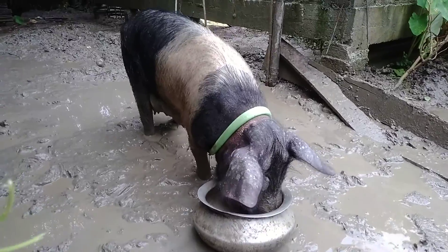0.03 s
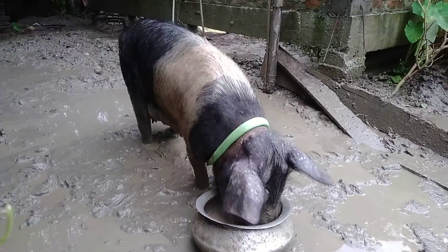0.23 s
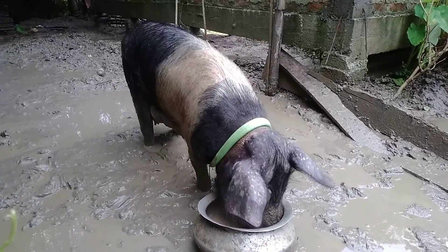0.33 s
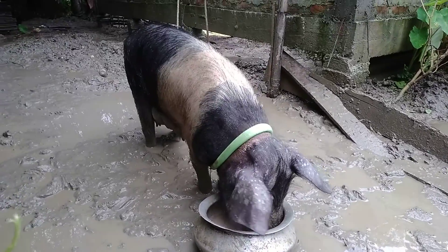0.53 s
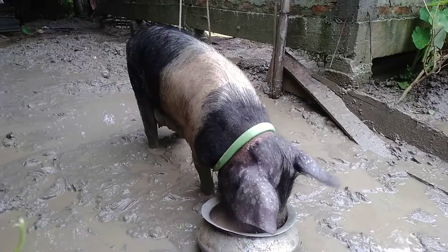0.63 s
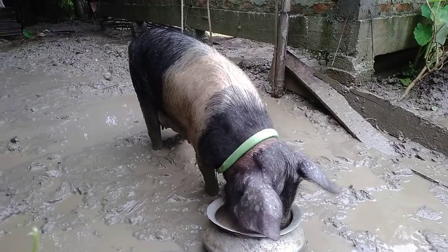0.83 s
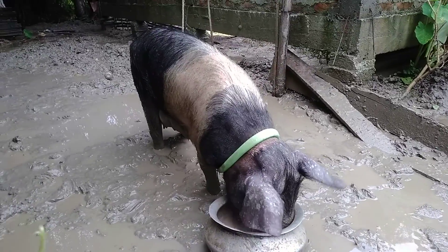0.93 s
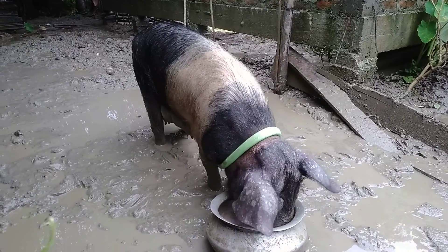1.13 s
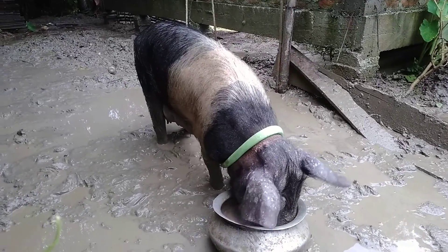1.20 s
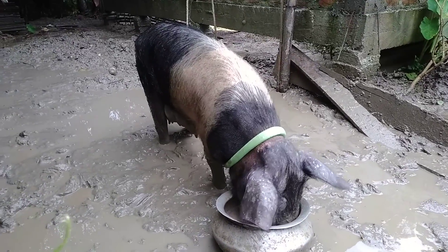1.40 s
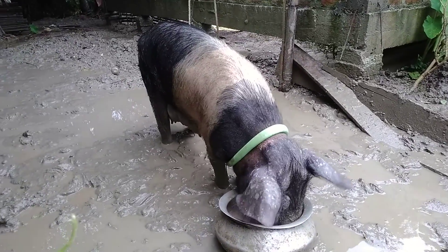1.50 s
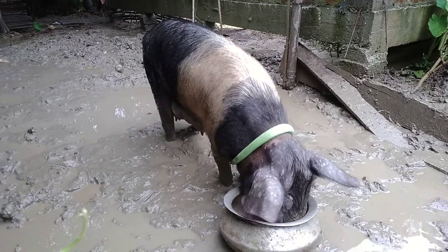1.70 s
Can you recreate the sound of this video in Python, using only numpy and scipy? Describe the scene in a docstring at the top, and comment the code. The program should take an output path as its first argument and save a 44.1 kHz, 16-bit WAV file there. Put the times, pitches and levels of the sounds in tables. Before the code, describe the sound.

A pig chews wet feed from a metal pot, close by. The loudest wet smack comes at about 0.25 seconds, with more near 0.5 and 0.8, each led by a soft squelch and joined by pops and a small hollow thump. Slurping smacks follow around 1.15 and 1.5 seconds, each trailed by tiny drips. Short wall echoes and a faint outdoor hiss lie behind.

```python
"""Pig eating from a pot

A pig eats wet feed from a metal pot in a walled outdoor pen, about three chews a second.
Each chew is a soft squelch of mash, then a wet smack: films of slop crackle, air pockets pop,
and the hollow of the pot answers with a low thump. Later come a few slurps and drips.
Short wall echoes and a faint hiss lie behind."""
import sys
import numpy as np
from scipy import signal
from scipy.fft import rfft, irfft
from scipy.io import wavfile
from scipy.ndimage import uniform_filter1d

SR = 44100
rng = np.random.default_rng(int(sys.argv[2]) if len(sys.argv) > 2 else 0)


def unload_audio(sound):
    """Save the sound as a 16-bit wav file, at the path given as the first command line argument."""
    columns = np.transpose(np.atleast_2d(sound))
    # keep every value between -1 and 1, then stretch to whole-number steps
    steps = np.round(np.clip(columns, -1, 1) * 32767)
    wavfile.write(sys.argv[1], SR, steps.astype(np.int16))


N = 77175
T = np.arange(N) / SR

# The tones at which the pot rings with the snout in it: f/Hz, width/Hz, level/dB
POT_TONES = [(726, 34, -3.5), (1038, 43, -7), (1139, 21, 2), (1386, 51, 3.5), (1853, 86, -1),
             (2103, 55, -1.5), (2360, 40, -1), (2787, 27, -5.5), (3264, 88, -4), (4038, 68, -3.5),
             (6005, 160, -8.5)]
# Tone colour of wet crackle: f/Hz, level/dB
CRACKLE_COLOUR = [(600, -45), (1100, -14.5), (1900, -10.5), (2900, -2), (4200, 4), (5100, -6), (6100, -0.5),
                  (7500, -10.5), (15000, -30.5)]
# Tone colour of the fine, high fizz: f/Hz, level/dB
FIZZ_COLOUR = [(500, -44), (4500, -38), (6800, 2.5), (9300, 3.5), (10800, -4.5), (14000, -5), (15000, -35)]

MOUTH_WIDTH, FIZZ_WIDTH, POT_WIDTH = 0.64, 0.76, 0.25  # stereo width in radians; 0 is mono
RING_BUILD_S = 0.001493
POP_WOBBLE = 0.048  # wavering, as a fraction of the pitch


def amp(db):
    """Turns decibels into a gain."""
    return 10 ** (np.asarray(db) / 20)


def unit(x):
    """Scales a signal to an average (rms) level of 1."""
    return x / np.sqrt(np.mean(x ** 2) + 1e-20)


def read(points, hz):
    """Reads between the rows of a table, on a log-frequency axis."""
    f, value = np.transpose(points)
    return np.interp(np.log(hz + 1), np.log(f + 1), value)


def add(mix, start_s, sound):
    """Mixes a sound in at a given time."""
    part = mix[:, max(round(start_s * SR), 0):][:, :sound.shape[-1]]
    part += sound[..., :part.shape[1]]


def bins(size=2048):
    """The frequencies at which a short filter is set."""
    return np.fft.rfftfreq(size, 1 / SR)


def make_filter(db):
    """A filter with the given tone colour that rings only after a click, never before."""
    log_gain = np.log(amp(np.maximum(np.r_[db, db[-2:0:-1]], -70)))
    response = np.fft.ifft(np.exp(np.conj(signal.hilbert(log_gain)))).real
    return response / np.linalg.norm(response)


def table_filter(points):
    """A filter with the tone colour of a table."""
    return make_filter(read(points, bins()))


def hump(hz, octaves):
    """A filter like a hollow that favours a broad band around one pitch."""
    return make_filter(-20 * np.log10(1 + (np.log2((bins() + 1) / hz) / octaves) ** 2))


def swell(rise, fall):
    """A smooth rise and a fading fall; gives the time before the peak and the loudness shape."""
    lead = 2.5 * rise
    t = np.arange(-lead, 6 * fall, 1 / SR)
    return lead, np.where(t < 0, np.exp(-(t / rise) ** 2), np.exp(-abs(t) / fall))


def hollow_ring(tones, size=8192):
    """A hollow answers one click: its tones build up quickly, and the wider ones die sooner."""
    t = T[:size]
    ring = sum(amp(db) * width * np.exp(-np.pi * width * t) * np.cos(2 * np.pi * hz * t)
               for hz, width, db in tones)
    ring *= 1 - np.exp(-t / RING_BUILD_S)
    return ring / np.linalg.norm(ring)


def film_clicks(per_s, spread_db, size):
    """Wet films burst at random, each a click of uneven strength."""
    chance, strength, sign = rng.random((3, size))
    level_db = spread_db * np.minimum(-np.log(strength + 1e-9), 4)
    return (chance < per_s / SR) * np.sign(sign - .5) * amp(level_db)


def burst(shape, colour, width, size=16384):
    """A clump of film clicks follows a loudness shape, is filtered and spreads to both ears."""
    layers = []
    for _ in range(2):
        clicks = film_clicks(per_s=5000, spread_db=4, size=size)[:len(shape)] * shape[:size]
        coloured = signal.fftconvolve(clicks, colour)
        layers.append(coloured * np.linalg.norm(shape) / (np.linalg.norm(coloured) + 1e-12))
    middle, side = layers
    return np.cos(width) * middle + np.sin(width) * np.array([side, -side])


def ringing_burst(shape, tones):
    """Clumps of clicks feed each tone of a hollow with its own share of the energy."""
    shares = np.array([amp(db) * np.sqrt(width) for hz, width, db in tones])
    shares /= np.linalg.norm(shares)
    return sum(share * burst(shape, hollow_ring([tone]), POT_WIDTH) for share, tone in zip(shares, tones))


def air_ring(hz, rise, fall, glide, wobble):
    """Trapped air rings with a wavering pitch; gives the time before the peak and the sound."""
    lead, shape = swell(rise, fall)
    drift = unit(uniform_filter1d(rng.standard_normal(N), size=int(SR / hz) + 30))[:len(shape)]
    drift -= np.average(drift, weights=shape ** 2)
    pitch = hz * np.exp(glide * (T[:len(shape)] - lead) + wobble * drift)
    return lead, shape * np.sin(2 * np.pi * np.cumsum(pitch) / SR)


def hiss():
    """Outdoor rumble and faint hiss, slightly patchy."""
    # Tone colour of the background: f/Hz, level/dB
    colour = [(25, -20), (55, -18), (95, 7), (150, -2.5), (240, -2.5), (450, -12.5), (1000, -14),
              (2200, -14.5), (3900, -13.5), (5300, -23.5), (7200, -16), (8800, -20.5), (9800, -3),
              (10300, -15), (11000, -50), (14500, -25)]
    # How alike the two ears are: f/Hz, likeness (1 is the same)
    likeness = [(100, 1), (400, 0.61), (1500, 0.16), (4000, 0.053), (10000, 0.037)]
    hz = bins(size=1024)
    a, b, c, d, patches = rng.standard_normal((N // 256 + 5, len(hz), 5)).T
    patches = uniform_filter1d(patches, size=12, axis=0)  # smooth across pitch
    patch_db = unit(uniform_filter1d(patches, size=14, axis=1))  # and across time
    same = np.clip(read(likeness, hz), -1, 1)[:, None]
    left = a + 1j * b
    right = same * left + np.sqrt(1 - same ** 2) * (c + 1j * d)
    spectrum = np.array([left, right]) * amp(read(colour, hz)[:, None] + patch_db)
    return amp(-55.5) * unit(signal.istft(spectrum, nperseg=1024, noverlap=768)[1][:, :N])


def chewing():
    """Quiet, steady chewing: sparse film clicks crackle and ring the pot."""
    clicks = film_clicks(per_s=220, spread_db=3.5, size=N)
    crackle = unit(signal.fftconvolve(clicks, table_filter(CRACKLE_COLOUR))[:N])
    pot = unit(signal.fftconvolve(clicks, hollow_ring(POT_TONES))[:N])
    return amp(-79) * crackle + amp(-72.5) * pot


def bubbles(shape, hz, count=64, size=600):
    """Tiny bubbles burst along a loudness shape; later ones sound lower as the gap widens."""
    per_s, sink_per_s, fade_cycles = 480, 5.55, 5
    spread_db, pan_db = 2.5, 5.5
    out = np.zeros((2, len(shape) + size))
    peak_s = np.argmax(shape) / SR
    for k, (late, detune, strength, pan) in enumerate(rng.standard_normal((count, 4))):
        s = abs(k + late / 2) / per_s
        if s * SR < len(shape):
            cycles = T[:size] * hz * np.exp(0.171 * detune - sink_per_s * (s - peak_s))
            ring = np.sin(2 * np.pi * cycles) * np.exp(-cycles / fade_cycles) * (1 - np.exp(-cycles))
            ear_gains = amp(spread_db * strength + pan_db * pan * np.array([[1], [-1]]))
            add(out, s, shape[int(s * SR)] * ear_gains * ring)
    return out * np.linalg.norm(shape) * np.sqrt(2) / np.linalg.norm(out)


def squelches():
    """The snout stirs the mash: it bubbles, rings the pot, crackles softly and fizzes."""
    # Stirs of the snout: peak t/s, rise/s, fall/s, level/dB, centre f/Hz, pot ring/dB
    stirs = [(0.184, 0.005, 0.028, -50.5, 2640, -52.5), (.449, 0.0037, 0.024, -48, 2850, -55),
             (.502, 0.0069, 0.027, -46.5, 2580, -67), (.7235, 0.0034, 0.0098, -47, 3730, -51.5),
             (.758, .014, 0.032, -53, 2950, -50.5), (.868, 0.0022, 0.011, -53, 4180, -57.5),
             (.896, 0.0035, 0.012, -52.5, 3830, -60), (1.067, .008, 0.044, -56.5, 3400, -55),
             (1.161, .012, .014, -36.5, 3754, -48), (1.453, 0.004, 0.016, -56, 2400, -46.5)]
    out = np.zeros((2, N))
    pot, fizz = hollow_ring(POT_TONES), table_filter(FIZZ_COLOUR)
    for s, rise, fall, db, hz, pot_db in stirs:
        lead, shape = swell(rise, fall)
        add(out, s - lead, amp(db) * bubbles(shape, hz))
        add(out, s - lead, amp(pot_db) * burst(shape, pot, POT_WIDTH))
        add(out, s - lead, amp(db - 5.5) * burst(shape, hump(hz, octaves=0.86), MOUTH_WIDTH))
        add(out, s - lead, amp(db - 6) * burst(shape, fizz, MOUTH_WIDTH))
    return out


def chirps():
    """Single bubbles open in the mash, most with a quick slide in pitch."""
    # Opening bubbles: peak t/s, f/Hz, level/dB, glide/(log pitch per s)
    openings = [(.184, 1895, -50, -21), (.202, 2350, -49, 0), (.4505, 3450, -49, -10),
                (.455, 2310, -48.5, -23.5), (.461, 3120, -50, -30), (1.457, 2400, -42, 13.5),
                (1.596, 4270, -50, -1), (1.617, 3220, -50.5, -13)]
    out = np.zeros((2, N))
    for s, hz, db, glide in openings:
        lead, ring = air_ring(hz, rise=.003, fall=.003, glide=glide, wobble=POP_WOBBLE)
        add(out, s - lead, amp(db) * ring)
    return out


def pops():
    """Each air pocket sings briefly, sinking a little in pitch."""
    # Air pockets in the mouth and under the snout: peak t/s, f/Hz, level/dB, rise/s, fall/s
    pockets = [(.191, 1398, -46, 0.0046, 0.0079), (.243, 725, -41.5, 0.0027, 0.0066),
               (0.2417, 1392, -28.5, 0.0018, 0.0058), (0.2453, 2832, -17.5, .0018, 0.0016),
               (.247, 4043, -23.5, 0.0014, 0.0019), (.466, 1380, -45.5, .003, .005),
               (0.4863, 1110, -39.5, 0.0017, 0.0026), (.505, 1414, -40, 0.0031, 0.0044),
               (.767, 1330, -41.5, 0.0019, 0.002), (0.779, 1398, -47, .003, 0.0022),
               (.7945, 570, -39, .003, 0.01), (.796, 747, -39.5, 0.0029, 0.012),
               (0.795, 1453, -27, 0.0034, 0.004), (1.001, 1374, -50.5, 0.0052, 0.0076),
               (1.158, 1377, -39.5, .008, 0.013), (1.1534, 3760, -27, 0.00092, 0.0024),
               (1.176, 3400, -24.5, 0.00097, 0.0016), (1.398, 2720, -44.5, 0.0017, 0.0029),
               (1.4, 1885, -41, 0.0045, 0.014), (1.474, 1099, -45, 0.016, 0.028)]
    out = np.zeros((2, N))
    for s, hz, db, rise, fall in pockets:
        lead, ring = air_ring(hz, rise, fall, glide=-1.516, wobble=POP_WOBBLE)
        add(out, s - lead, amp(db) * ring)
    return out


def thumps():
    """The closing jaw pushes air into the pot, where it bounces for a few cycles."""
    # Pushes of air: peak t/s, f/Hz, level/dB, rise/s, fall/s
    pushes = [(0.242, 299.5, -30, 0.0035, 0.005), (0.502, 305, -42, 0.0039, 0.0061),
              (0.5253, 328.4, -29, 0.00452, 0.007), (0.7976, 355, -34.5, .004, 0.0085),
              (.878, 299, -49.5, 0.00811, 0.032), (1.499, 337.4, -38.5, 0.0045, 0.015)]
    out = np.zeros((2, N))
    for s, hz, db, rise, fall in pushes:
        lead, ring = air_ring(hz, rise, fall, glide=0, wobble=0.097)
        add(out, s - lead, amp(db) * ring)
    return out


def smacks():
    """Lips part: a dense crackle coloured by the mouth, with fizz on top, rings the pot."""
    # Lip smacks: peak t/s, rise/s, fall/s, pot ring/dB, crackle/dB, fizz/dB, mouth f/Hz
    lip_smacks = [(0.2469, .0042, 0.0039, -28.5, -22, -29.5, 2810),
                  (.488, 0.0021, 0.0044, -47, -43.5, -38, 3470),
                  (0.52, 0.0013, 0.0025, -35, -32.5, -35.5, 4300),
                  (0.525, 0.0018, 0.0032, -37, -29, -35.5, 4100),
                  (0.7948, .0018, 0.0028, -34.5, -37.5, -35, 3270),
                  (0.7976, 0.0015, 0.0025, -35, -32, -30.5, 3480),
                  (1.138, 0.003, 0.021, -50.5, -43, -44, 3790),
                  (1.156, .007, 0.013, -41.5, -36.5, -40, 4070),
                  (1.177, 0.0018, 0.01, -42, -44.5, -61, 3220),
                  (1.193, 0.0033, 0.0016, -50, -38.5, -41, 4160),
                  (1.41, 0.0035, 0.012, -46, -50.5, -45.5, 4260),
                  (1.4705, 0.0012, 0.0013, -45, -29.5, -32.5, 3140),
                  (1.478, .006, 0.014, -44, -40.5, -41.5, 2340),
                  (1.494, 0.0034, 0.0077, -43, -36.5, -44.5, 3720)]
    boost_db, boost_octaves = 5.5, 0.12
    out = np.zeros((2, N))
    fizz = table_filter(FIZZ_COLOUR)
    for s, rise, fall, pot_db, crackle_db, fizz_db, mouth_hz in lip_smacks:
        lead, shape = swell(rise, fall)
        mouth_db = boost_db / (1 + (np.log2((bins() + 1) / mouth_hz) / boost_octaves) ** 2)
        crackle = make_filter(read(CRACKLE_COLOUR, bins()) + mouth_db)
        add(out, s - lead, amp(crackle_db) * burst(shape, crackle, MOUTH_WIDTH))
        add(out, s - lead, amp(fizz_db) * burst(shape, fizz, FIZZ_WIDTH))
        pot_start = s - lead - rise / 2 - RING_BUILD_S  # early, as the ring needs time to build
        add(out, pot_start, amp(pot_db) * ringing_burst(shape, POT_TONES))
    return out


def slurps():
    """Slop sucked through the lips gurgles in the low, broad tones of the mouth."""
    # Sucks of slop: peak t/s, rise/s, fall/s, level/dB
    sucks = [(1.156, .009, 0.016, -39), (1.456, 0.00497, 0.026, -53), (1.493, 0.003925, 0.012, -46.5)]
    # Tones of the back of the mouth: f/Hz, width/Hz, level/dB
    mouth_tones = [(325, 106, -3.5), (590, 35, 3.5), (797, 106, -8)]
    out = np.zeros((2, N))
    for s, rise, fall, db in sucks:
        lead, shape = swell(rise, fall)
        add(out, s - lead, amp(db) * ringing_burst(shape, mouth_tones))
    return out


def drips(fall_s=0.000887):
    """Slop drips, each drop a tiny wet tick."""
    # Drops: peak t/s, level/dB, centre f/Hz
    drops = [(1.2725, -44, 6600), (1.2846, -42, 2240), (1.2994, -43.5, 2030), (1.576, -47.5, 3200),
             (1.596, -45.5, 10100)]
    out = np.zeros((2, N))
    lead, shape = swell(fall_s / 2, fall_s)
    for s, db, hz in drops:
        add(out, s - lead, amp(db) * burst(shape, hump(hz, octaves=0.33), MOUTH_WIDTH))
    return out


def pen_echoes(sound, size=22050):
    """Sound scatters quickly off the pot rim and ground, then a short tail returns from the walls."""
    # Time the wall echo takes to fade by 60 dB: f/Hz, t/s
    fade_times = [(250, 0.02), (1200, 1.3), (3700, 1.1), (10000, 0.26)]
    # Strength of the wall echo: f/Hz, level/dB
    wall_levels = [(250, -8.5), (1200, -20.5), (3700, -21.5), (8000, -12), (14000, -17)]
    near_delay_s, near_fade_s, wall_build_s = 0.002, 0.017, 0.009
    t = T[:size]
    near, far = rng.standard_normal((2, 2, size)) * (rng.random((2, 2, size)) < .1)  # sparse bounces
    near = near * np.exp(-t / near_fade_s) * (t > near_delay_s)
    near = signal.sosfilt(signal.butter(2, 1800, "high", fs=SR, output="sos"), near)
    near = amp(-7.5) * near / np.linalg.norm(near[0])
    hz, frame_s, spectrum = signal.stft(unit(far), SR, nperseg=256)
    fade_s = read(fade_times, hz)[:, None]
    spectrum *= amp(read(wall_levels, hz)[:, None] - 60 * frame_s / fade_s)
    spectrum *= np.sqrt(2 * np.log(1000) / (fade_s * SR))  # a longer fade adds no energy
    walls = signal.istft(spectrum, SR, nperseg=256)[1][:, :size] * np.minimum(t / wall_build_s, 1)
    return signal.fftconvolve(sound, walls + near, axes=1)[:, :N]


def scene():
    """The feeding pig, its echoes and the background."""
    pig = smacks() + thumps() + pops() + chirps() + slurps() + squelches() + drips() + chewing()
    return pig + pen_echoes(pig) + hiss()


def record(dry):
    """The right microphone hears little bass; filters then cut deep rumble and the highest treble."""
    # How much louder the left side is than the right: f/Hz, level/dB
    balance = [(60, 14), (370, 13), (540, 1.5), (1400, 0), (2100, -4.5), (2800, 0.5), (4500, 0.5),
               (7000, -2), (9500, 2), (14000, 2.5)]
    low_cut_hz, high_cut_hz = 106, 14600
    ratio = amp(read(balance, bins(2 * N)))
    ear_gains = np.array([ratio, np.ones_like(ratio)]) * 2 / (1 + ratio)
    heard = irfft(rfft(dry, 2 * N) * ear_gains)[:, :N]
    heard = signal.sosfilt(signal.butter(2, low_cut_hz, "high", fs=SR, output="sos"), heard)
    treble_cut = signal.firwin(255, high_cut_hz, window=("kaiser", 8), fs=SR)
    return signal.oaconvolve(heard, treble_cut[None], "same")


dry = scene()
out = record(dry)
unload_audio(out)
```